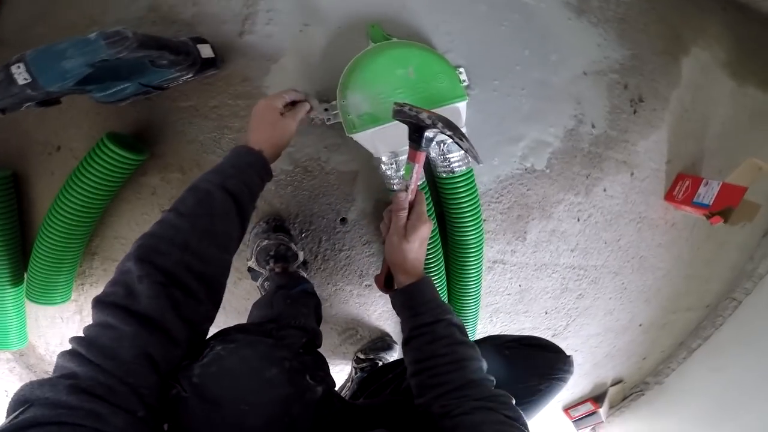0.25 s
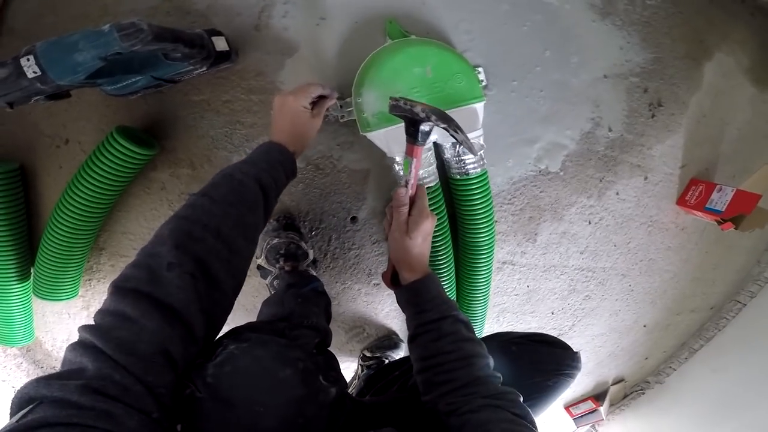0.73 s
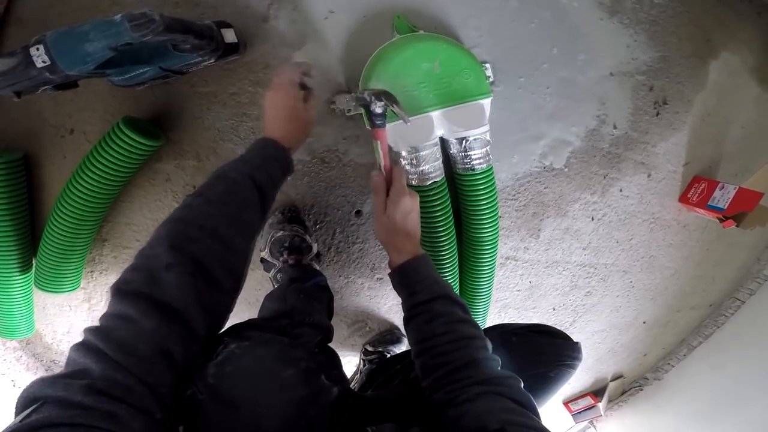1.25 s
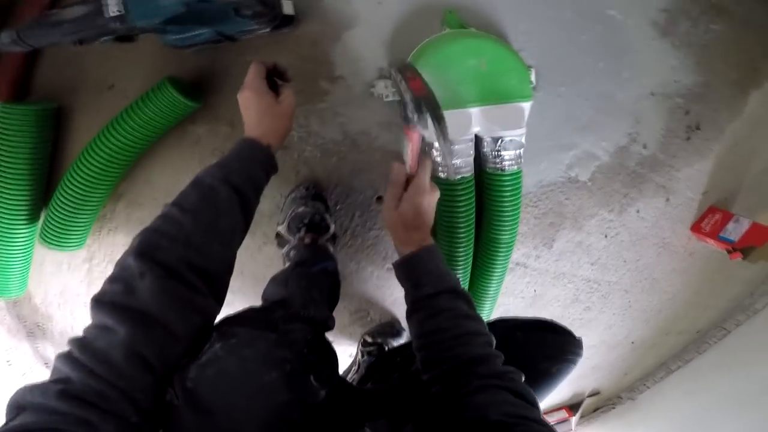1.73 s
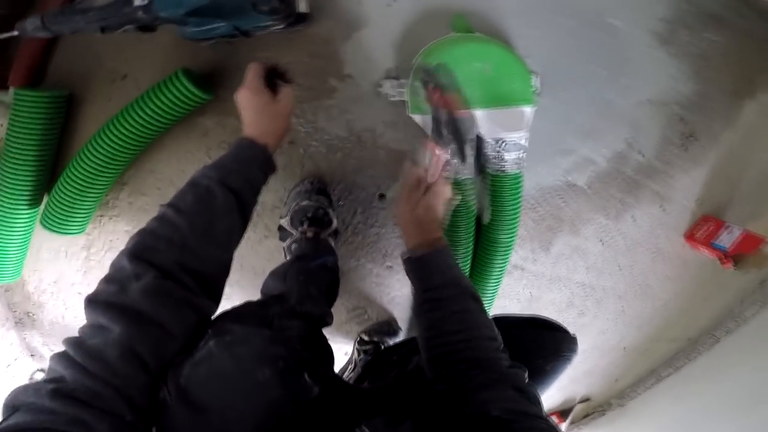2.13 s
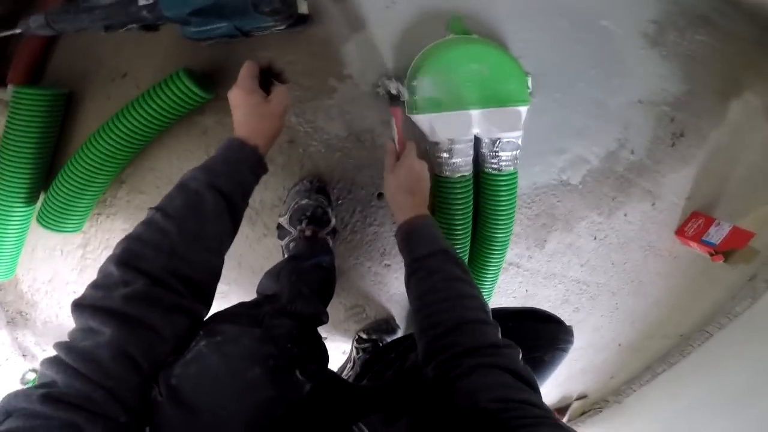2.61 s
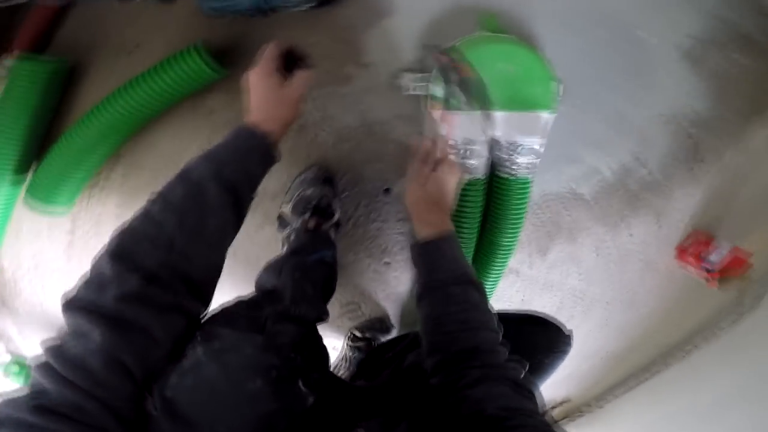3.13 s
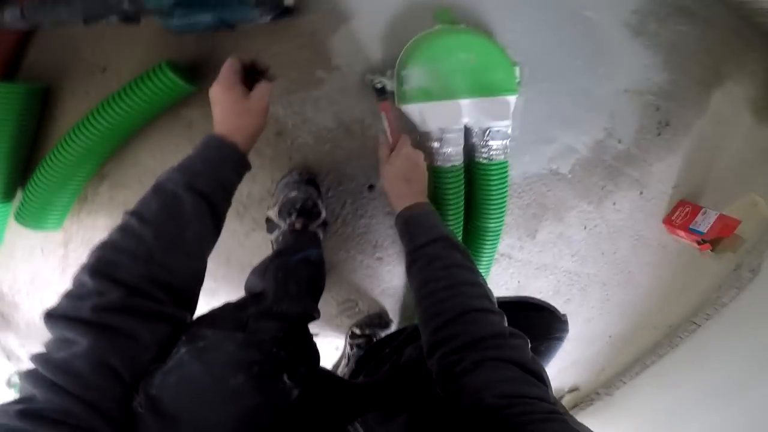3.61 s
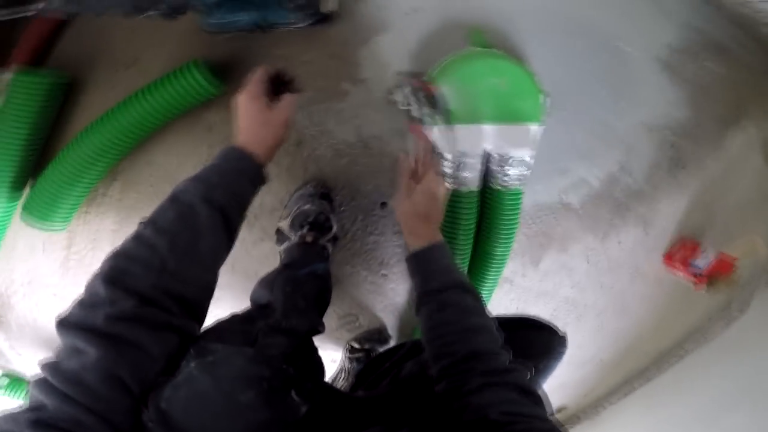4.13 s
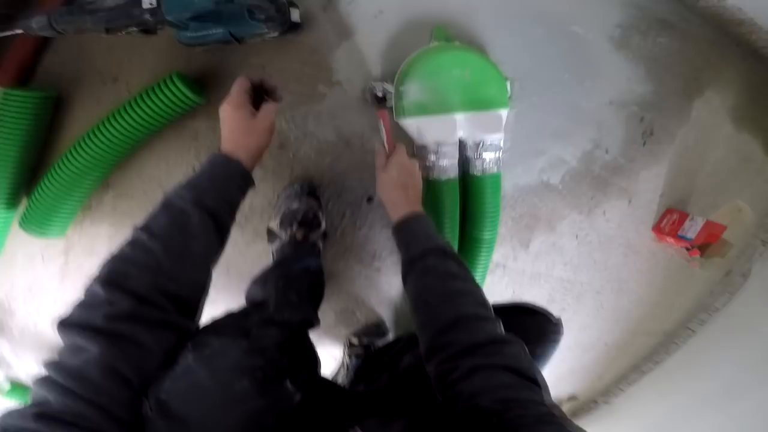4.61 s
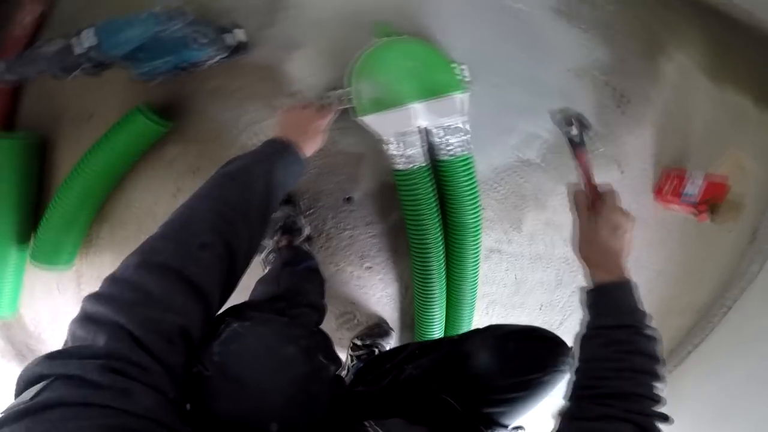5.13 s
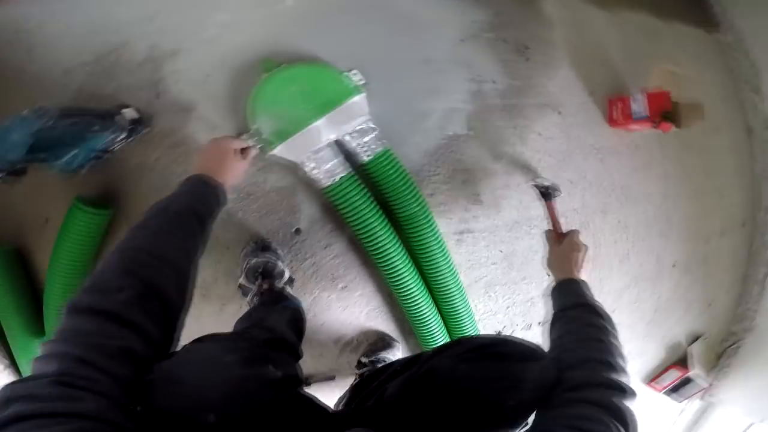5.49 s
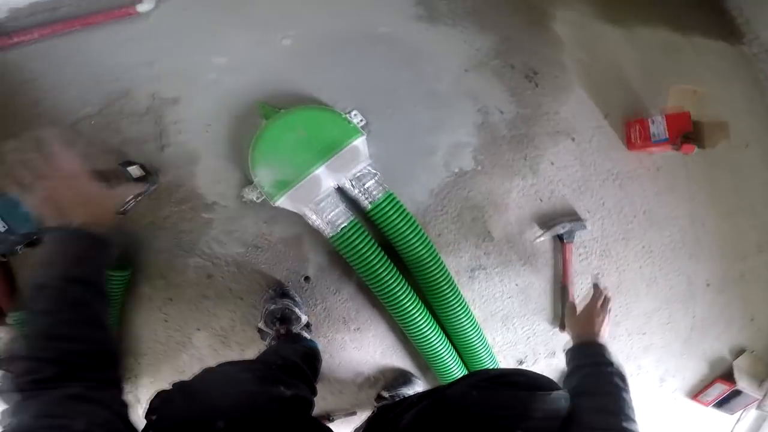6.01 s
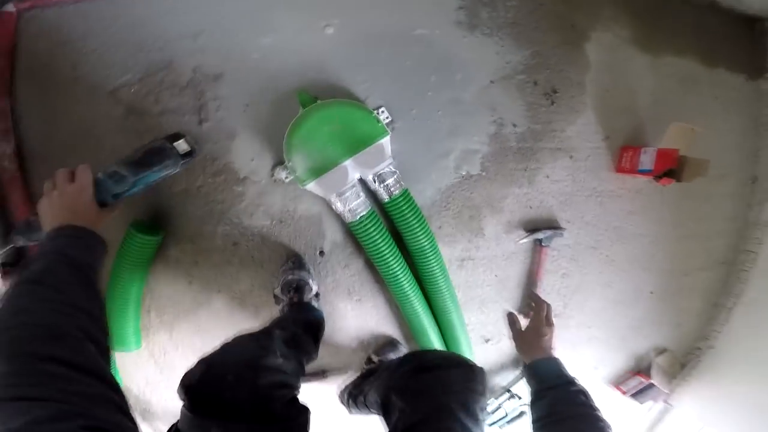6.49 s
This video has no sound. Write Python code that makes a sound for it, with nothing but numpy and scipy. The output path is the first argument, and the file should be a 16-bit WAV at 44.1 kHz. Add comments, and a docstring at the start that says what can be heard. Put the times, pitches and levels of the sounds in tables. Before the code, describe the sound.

In a bare, boomy room with a low motor hum, a steel hammer strikes a metal anchor in concrete ten times, then is laid down clinking.

```python
"""In a bare, boomy room a far motor hums throughout, as wavering tones over a rumble, and small parts tick.
From 1.5 s a steel hammer drives an anchor into a concrete floor: ten blows, each a crack, a thud of the slab,
ringing metal and the room's answer. Then a plastic box swings round on the grit (shaped noise), with hoses bumping
behind it, and the hammer is laid down with clinks (short rings). More small ticks follow, and a tool is dragged
near. Clothing rustles now and then, and a limiter squeezes the loud moments."""
import sys
import numpy as np
from scipy import signal
from scipy.io import wavfile

SR = 44100
rng = np.random.default_rng(int(sys.argv[2]) if len(sys.argv) > 2 else 0)


def materialize(psi):
    """Save the field psi as 16-bit PCM at rate SR to the path in sys.argv[1].

    A 1-D psi becomes a single channel; in a 2-D psi each row is a channel.
    """
    bounded = np.clip(np.atleast_2d(psi).T, -1, 1)
    quanta = np.round(bounded * 32767).astype(np.int16)
    wavfile.write(sys.argv[1], SR, quanta)


N = 297675   # length in samples

# Hammer blows: [start_s; crack: low_db, middle_db, bright_db, top_db; slab: deep_db, boom_db, body_db;
# room, in six ranges of pitch from 450 Hz up: six levels in dB;
# rings: face_db, high_db, claw_db, bracket_db; anchor: knock_db, knock_hz, clang_db, clang_hz]
BLOWS = [(1.526, -6, -13, -9, -2, -38, -36.5, -41, -32.5, -40, -30.5, -42, -33.5, -31, -46, -40, -43, -37, -23, 550, -28.5, 3324),
         (1.8795, -9, -9.5, -3, -2, -28.5, -31, -35.5, -34, -25.5, -29, -28, -21.5, -29, -49, -24, -42, -41, -17.5, 606, -20, 2380),
         (2.2528, 0, -12.5, -4, 4, -26.5, -29, -30.5, -59, -24.5, -31, -32.5, -25.5, -27, -39, -21.5, -30, -20.5, -29, 594, -41, 1120),
         (2.6173, 0, -9.5, -9.5, -2.5, -27.5, -28.5, -28, -31.5, -24, -28.5, -24.5, -36, -26.5, -44, -41, -54, -27.5, -26, 798, -15.5, 3290),
         (2.9521, -3.5, -12, -7.5, 0.5, -28, -29, -27, -31, -22.5, -35, -27.5, -30, -29.5, -30, -15, -48, -20, -18.5, 499, -15.5, 1080),
         (3.291, -1.5, -11, -6.5, 0, -26, -29.5, -26.5, -23, -26.5, -27.5, -32, -26, -29, -27, -28, -40, -44, -14.5, 562, -12.5, 1172),
         (3.6144, 3, -11.5, -11, -2, -29, -28.5, -27.5, -21, -28, -28.5, -27.5, -39, -30, -34, -34, -37.5, -26, -17, 490, -19, 1420),
         (3.943, -17, -3, 2.5, -2, -27, -33.5, -26.5, -24, -21.5, -28.5, -22, -21.5, -39, -38, -34, -45, -34, -5, 740, -35, 2150),
         (4.271, 2, -14, -13.5, -9.5, -31, -37.5, -31, -26, -27.5, -26.5, -33, -30.5, -42, -60, -49, -51, -28, -30, 575, -23.5, 2210),
         (4.5665, 2.5, -12, -5.5, -6, -30, -33, -31, -30.5, -22.5, -22.5, -29, -23, -36, -43, -38, -42, -15, -15.5, 599, -12, 2280)]
# Light touches of the hammer face around a blow: [start_s, level_db, clack_db, clack_hz]
REBOUNDS = [(2.9837, -24.5, -18, 1200), (3.315, -36, -28, 1260), (3.932, -42, -19, 714),
            (4.2977, -18.5, -6.5, 1950), (4.3132, -25, -6, 2070), (4.59, -21, -6.5, 1860)]


def hammer():
    """Steel meets anchor and floor: gives the blows with their room sound, and apart from them the ringing metal."""
    (start_s, low_db, middle_db, bright_db, top_db, deep_db, boom_db, body_db, *room_db,
     face_db, high_db, claw_db, bracket_db, knock_db, knock_hz, clang_db, clang_hz) = np.transpose(BLOWS)
    s = start_s + .001     # every part of the blow is timed from 1 ms after its listed start
    rebound_s, rebound_db, clack_db, clack_hz = np.transpose(REBOUNDS)

    crack_db = 3 + np.transpose([low_db, middle_db, bright_db, bright_db, top_db, top_db])
    near = sum(scattered_crack(at, db) for at, db in zip(s, crack_db))
    near = near + sum(scattered_crack(at, [db + 7] * len(CRACK)) for at, db in zip(rebound_s, rebound_db))
    thud = slab_thud(s, deep_db, boom_db, body_db, rebound_s, rebound_db)
    boom = room(s, np.array([boom_db, *room_db]))

    rings = head_rings(s, claw_db, face_db, high_db) + strike(s, bracket_db, BRACKET, spread_db=2.5)
    rings += anchor_rings(rebound_s, clack_db, clack_hz, CLACK, spread_db=1.5)
    rings += anchor_rings(s, clang_db, clang_hz, CLANG, spread_db=2.5)
    rings += anchor_knocks(s, knock_db, knock_hz)
    return near + thud + boom, rings


# Short tones that make up a crack: [pitch_hz, level_db, t60_s] (t60: time to fall by 60 dB)
CRACK = [(1100, 6.5, 0.00078), (2670, 11, 0.0016), (3750, 6.5, 0.0026), (6540, 5, 0.0023),
         (9900, -13, 0.0027), (12900, -22, 0.0048)]


def scattered_crack(at, levels_db):
    """Short tones make one crack, roughened by a fresh burst of noise and echoed by the floor."""
    t = np.arange(round(.03 * SR)) / SR
    crack = 0
    for k, (db, (hz, level_db, t60)) in enumerate(zip(levels_db, CRACK)):
        crack = crack + ring(from_db(db + level_db) * (-1) ** k * (t == 0), hz, t60)

    scatter = from_db(-11.5) * rng.standard_normal((2, len(t))) * np.exp(-t / 0.0045) * (t > .0015)
    scatter[:, 0] = 1     # the direct sound
    floor_echo_s = rng.uniform(.0028, .0034)
    scatter[:, round(floor_echo_s * SR)] += from_db(-4)

    out, first = np.zeros((2, N)), round(at * SR)
    out[:, first:first + len(t)] = signal.fftconvolve(crack[None], scatter, axes=1)[:, :len(t)]
    return out


# Slab and low room tones, sorted roughly from deep through boom to body: [pitch_hz, level_db, t60_s]
SLAB = [(30, -45, 0.27), (38, 1, 0.52), (46.35, 2, 0.56), (71.7, -0.5, 0.51), (79.08, -3, 1),
        (86.37, -9.5, 1), (102.6, 11.5, 0.35), (113.5, -11, 1), (120, -33, 0.86), (136.3, -1, 0.46),
        (146.6, 4, 0.38), (173, -6.5, 0.82), (187.7, 2, 0.52), (199.7, -5, 0.48), (223, -5, 0.94),
        (218.8, -4, 0.81), (236.5, -12.5, 1), (249, -2.5, 0.82), (266.3, -5.5, 0.67), (279.8, -9, 0.86),
        (300.5, 3, 0.22), (319.7, -4, 0.74), (341.2, 1, 0.36), (360, -9.5, 0.85), (373, -0.5, 0.39),
        (447, -5, 0.16), (431, -4.5, 0.26), (490, -45, 1)]
# First give of the floor under the blow: [pitch_hz, level_db, t60_s]
PUSH = [(165, 0, .045)]
SLAB_SHIFT = .025   # spread of the slab's pitch from blow to blow, as a share


def slab_thud(s, deep_db, boom_db, body_db, rebound_s, rebound_db):
    """The floor gives way first, then the slab and the low room tones ring, a little retuned at each blow."""
    thud = -strike(s + 0.0003, body_db + 29.5, PUSH, spread_db=4.0)
    for db, modes in zip((deep_db, boom_db, body_db), (SLAB[:9], SLAB[9:18], SLAB[18:])):
        # one part swings opposite ways left and right
        thud = thud + strike(s + 0.0047, db - 7.5, modes, spread_db=6.0) * [[1], [-1]]
        for at, blow_db, luck in zip(s, db, rng.standard_normal((len(s), len(modes)))):
            moved = [(hz * (1 + SLAB_SHIFT * z), level_db, t60) for (hz, level_db, t60), z in zip(modes, luck)]
            thud = thud + strike([at + .003], blow_db + 13, moved, spread_db=3)
    return thud + strike(rebound_s, rebound_db - 5.0, SLAB[18:], spread_db=5.0)


# Steel head: two low tones, eight of the claw, three of the face, three high ones: [pitch_hz, level_db, t60_s]
HEAD = [(1420, -3, 0.03), (2296, -13, 0.03), (2095, -9, .12), (2440, -1, 0.22), (3300, 9, .03),
        (3430, -5, .15), (3526, -1, 0.2), (3580, 6, 0.25), (2676, -9, .12), (4580, -1, .12),
        (3135, -6, .12), (3160, 5, 0.3), (4490, -2, 0.06), (8680, -6, 0.04), (8770, -6, 0.05),
        (9720, -9, 0.035)]
# Sheet-metal lug, also rung by each blow: [pitch_hz, level_db, t60_s]
BRACKET = [(900, -13, 0.028), (1035, 5, .04), (1148, 1, 0.27), (1176, -4, 0.15), (1220, 5, 0.038),
           (1372, 2, 0.074)]
WAVER_DB = 5   # spread of the rings' wavering


def head_rings(s, claw_db, face_db, high_db):
    """The struck steel head rings at its own pitches, and the rings waver randomly in level."""
    rings = 0
    for db, modes in zip((claw_db, face_db, high_db), (HEAD[4:10], HEAD[10:13], HEAD[13:])):
        rings = rings + strike(s, db, modes, spread_db=1.5) * from_db(WAVER_DB * drift(18))
    return rings


# Anchor under a rebound: [multiple of the clack pitch, level_db, t60_s]
CLACK = [(1, 0, .005), (.6, -5, .006), (1.35, -3, .004)]
# Anchor and lug jarred together: [multiple of the clang pitch, level_db, t60_s]
CLANG = [(.86, 2, .02), (.95, 5, .03), (1, 6, 0.035), (1.07, 4, 0.03), (1.16, 2.5, .03), (1.29, -1.5, .03)]


def anchor_rings(times, levels_db, pitches_hz, shape, spread_db):
    """The jarred anchor rings briefly in a cluster of tones, at a new pitch each time."""
    rings = 0
    for at, db, hz in zip(times, levels_db, pitches_hz):
        modes = [(hz * multiple, level_db, t60) for multiple, level_db, t60 in shape]
        rings = rings + strike([at], db, modes, spread_db=spread_db)
    return rings


def anchor_knocks(s, knock_db, knock_hz):
    """The struck anchor gives a short, hard snap of two tones and then rings a little."""
    knocks = 0
    for at, db, hz in zip(s, knock_db, knock_hz):
        snap = [(hz * multiple, 7, 0.03) for multiple in (1, .62)]
        knocks = knocks + strike([at], db, snap, spread_db=0)
        knocks = knocks + strike([at + .002], db, [(hz, 0, 0.12)], spread_db=0)
    return knocks


# Loudness of the reflections: [pitch_hz, level_db]
ROOM = [(60, -46), (110, -62), (180, 4.5), (330, -3.5), (500, -5), (800, -13), (1200, -11), (2100, -13),
        (3200, -13), (5000, -14.5), (6500, -4.5), (9000, -3), (10300, -5), (13000, -5), (16000, -42)]
# How long they last: [pitch_hz, t60_s]
ROOM_T60 = [(60, 1), (250, 0.49), (1000, 0.44), (4000, 0.29), (12000, 0.02)]
# Time they take to thicken: [pitch_hz, build_up_s]
BUILD_UP = [(100, 0.0022), (1000, 0.0035), (5000, 0.041)]
# Pitches that part the room's seven ranges: [pitch_hz]
SPLIT_HZ = 450, 850, 1500, 2800, 5000, 8000


def room(times, levels_db):
    """Reflections thicken, then die unevenly band by band, while a far space rings on more softly."""
    size = round(1.5 * SR)
    t = np.arange(size) / SR

    def dying(hz):
        t60 = at_hz(ROOM_T60, hz)
        build = 1 - np.exp(-(t / at_hz(BUILD_UP, hz)) ** 2)
        uneven = from_db(1.23 * drift(23)[:size])
        far_space = from_db(-20.0 - 60 * t / (3.01 * t60))
        return build * uneven * (from_db(-60 * t / t60) + far_space)

    # four different random noise patterns of the room take turns from blow to blow
    responses = [bands(white, ROOM, dying) for white in rng.standard_normal((4, 2, 2, size))]
    out = np.zeros((2, N + 2 * size))
    for k, (at, gains) in enumerate(zip(np.round(times * SR).astype(int), from_db(levels_db).T)):
        click = 1. * (np.arange(2048) == 0)
        push = gains[-1] * click
        for hz, lower, upper in zip(SPLIT_HZ, gains, gains[1:]):     # each range gets its own strength
            low_pass = signal.butter(2, hz, fs=SR, output="sos")
            push = push + (lower - upper) * signal.sosfilt(low_pass, click)
        out[:, at:at + size] += signal.fftconvolve(push[None], responses[k % 4], axes=1)[:, :size]
    return out[:, :N]


# Hammer head touching the floor as it is laid down:
# [start_s, level_db, ring_db, turn (face 0 to claw 1), click_db]
CLINKS = [(5.626, -49, -13, 1, -38), (5.6411, -41.5, 3, 0.083, -38), (5.7297, -28, 1, .01, -46),
          (5.8542, -10, -2, 0.81, -5), (5.8873, -12, -19, 0.51, -31), (5.925, -16, -15, 0.71, -25),
          (5.95, -25, -12, 0.8, -30), (6.008, -30, -9, 0.71, -32), (5.977, -15, -8, 0.28, -30),
          (6.0366, -18.5, -8.5, 0.33, -42), (6.0762, -30.5, -22, 0.74, -44)]
# Handle and grit: [pitch_hz, level_db, t60_s]
CLATTER = [(1490, -8, 0.014), (2100, 0.5, 0.0088), (2540, 3, 0.009), (3330, 6.5, 0.0063), (4660, 0, 0.0025),
           (6100, -3.5, 0.0061)]
FACE_DOWN_DB, CLAW_DOWN_DB = (10, -35, -3.5), (-28, 1, -23)   # shares of low, claw and face tones


def clinks():
    """Each touch on concrete rings the steel and clicks handle and grit, which clatter on for a tenth of a second."""
    s, db, ring_db, turn, click_db = np.transpose(CLINKS)
    shares_db = [ring_db + face + turn * (claw - face) for face, claw in zip(FACE_DOWN_DB, CLAW_DOWN_DB)]
    clatter, steel = strike(s, click_db, CLATTER, spread_db=0.0), 0
    for modes, share_db in zip((HEAD[:2], HEAD[2:10], HEAD[10:13]), shares_db):
        steel = steel + strike(s, db + share_db, modes, spread_db=1.5)

    late = 0.1 * rng.random((len(s), 40)).T     # forty weaker touches after each one, in seconds
    late_s = (s + late).ravel()
    clatter += strike(late_s, (db - 20 - 60 * late).ravel(), CLATTER[:5], spread_db=3)
    steel += strike(late_s, (db + shares_db[1] - 35 - 30 * late).ravel(), HEAD[2:10], spread_db=2.5)
    return clatter, steel


# Fingers and small parts ticking: [start_s, level_db, pitch_hz]
TICKS = [(0.58, -40, 3480), (0.8205, -42, 3030), (0.9738, -35.5, 2840), (0.989, -28.5, 2540),
         (1.011, -27, 3120), (1.041, -32, 2820), (1.052, -29.5, 2370), (1.115, -40.5, 3000),
         (6.289, -28.5, 3350), (6.2938, -27.5, 2440), (6.4486, -32.5, 2480), (6.486, -37, 3330)]


def ticks():
    """Small parts tick in flurries: a very short ring of four tones, then four weaker ones close behind."""
    out = np.zeros(N)
    for (at, db, hz), late in zip(TICKS, 0.0071 * rng.random((len(TICKS), 4))):
        modes = [(hz, 0, .005), (hz * 2.4, -14, .004), (hz * 0.71, -12, .005), (hz * 1.225, -5, .005)]
        levels_db = db + 2 - 14 * np.sign(np.r_[0, late])     # the later ones are 14 dB weaker
        out += strike([at, *(at + late)], levels_db, modes, spread_db=2)
    return out


# Things dragged over grit: [start_s, loudest_s, level_db, bright_share_db]
SCRAPES = [(5.305, 5.402, -29.5, -5), (6.579, 6.661, -38, 9)]
# Dull part of the scrape: [pitch_hz, level_db]
GRIT = [(180, -40), (300, -7), (813, -21), (1010, -8.5), (1640, -3.5), (2670, -11.5), (4500, -39),
        (5850, -39), (9900, -120)]
# Bright part of the scrape: [pitch_hz, level_db]
SHEEN = [(2060, -0.5), (3500, -5), (7960, -2), (9730, -39), (10700, -17), (13000, -33), (15000, -34)]
BITE_S, BITE_DB = 0.019, -9   # the grit bites quickly to a level below the loudest
RASP_FALL_DB_PER_S, SHEEN_FALL_DB_PER_S = 265, 100


def scrapes():
    """Grit under a dragged thing: a dull grainy rasp and a brighter sheen that fades more slowly."""
    t, rasp, sheen = np.arange(N) / SR, 0, 0
    for start, top, db, bright_db in SCRAPES:
        rise_db = np.interp(t, [start - BITE_S, start, start + BITE_S, top], [-80, -25, BITE_DB, 0])
        after = np.maximum(t - top, 0)
        rasp = rasp + from_db(db + rise_db - RASP_FALL_DB_PER_S * after)
        sheen = sheen + from_db(db + bright_db + rise_db - SHEEN_FALL_DB_PER_S * after)
    return rasp * hiss(GRIT, 1.0, 3.7) + sheen * hiss(SHEEN, 0.34, 2.5)


# Ribbed hoses bumping along behind the box: [time_s, level_db]
HOSES = [(5.36, -65), (5.408, -29.5), (5.47, -47), (5.654, -33), (5.796, -34.5), (5.958, -28),
         (6.23, -39.5), (6.29, -64), (6.4, -43), (6.54, -49)]
# Their colour: [pitch_hz, level_db]
HOSE = [(18, -19), (30, 4.5), (98, -20), (119, -9.5), (156, 6), (347, -13), (900, -15), (1170, -21),
        (1980, -120)]


def hoses():
    """Low noise swells and sinks as the ribbed hoses bump along."""
    return from_db(in_time(HOSES)) * hiss(HOSE, 0.84, 0)


def reflections(x):
    """The room answers light, bright contacts with dense noise that falls by 60 dB in half a second."""
    t = np.arange(round(.8 * SR)) / SR
    mid, side = rng.standard_normal((2, len(t)))
    stereo = mid + from_db(-3.5) * side * [[1], [-1]]
    response = stereo * from_db(-60 * t / 0.5) * (1 - np.exp(-t / 0.0005))
    response = response / np.sqrt(np.sum(response ** 2) / 2)
    return signal.fftconvolve(x, response, axes=1)[:, :N]


# Clothing swells: [loudest_s, level_db, rise_s, fall_s]
RUSTLE = [(.404, -62, 1.1, 0.42), (3.265, -43, 0.073, 0.18), (4.86, -51.5, 0.14, 0.54),
          (5.64, -40.5, 0.36, 0.38), (6.394, -48, 1.3, 1)]
# Colour of the cloth: [pitch_hz, level_db]
CLOTH = [(710, -32), (1200, -10), (1830, 8), (2520, -12), (2730, -12), (6750, -2), (14000, -37)]


def clothing():
    """Rubbing cloth is grainy noise that swells and fades."""
    return swells(RUSTLE) * hiss(CLOTH, 0.46, 3.0)


# Motor tone: [time_s, level_db]
HUM = [(0, -34.5), (.3, -33), (.49, -40.5), (.55, -34.5), (1.5, -38.5), (5.4, -39), (6.3, -39.5),
       (6.75, -45)]
# Tones above the motor's base pitch: [multiple, level_db]
HUM_ORDERS = [(2, 5), (4, -16), (5, -20.5), (6, -23), (8, -20), (9, -44)]
# The motor's fourth multiple swells once: [loudest_s, level_db, rise_s, fall_s]
GROAN = [(.52, -40.5, 0.35, 0.36)]
# Colour of the rumble: [pitch_hz, level_db]
RUMBLE = [(12, -43), (20, 10), (43, -5), (74, 1.5), (103, -5.5), (121, -16), (147, -10.5), (270, -12),
          (674, -24.5), (4560, -45.5), (7300, -38.5), (12000, -53), (15000, -95.5)]
HUM_HZ, RUMBLE_DB = 46.5, -38.5   # mean base pitch, rumble level


def motor():
    """Multiples of a slow motor's slightly wandering pitch waver over a broad rumble."""
    turn = 2 * np.pi * np.cumsum(HUM_HZ * (1 + 0.0043 * drift(2.4))) / SR
    tones = 0
    for k, db in HUM_ORDERS:
        waver_db = (2.0 if k == 2 else 5.0) * drift(1.0)
        tones = tones + from_db(db + waver_db) * np.sin(k * turn + 2 * np.pi * rng.random())
    groan = swells(GROAN) * np.sin(4 * turn)
    return from_db(in_time(HUM)) * tones + groan + from_db(RUMBLE_DB) * hiss(RUMBLE, 0.74, 0)


def swells(rows):
    """Each swell rises to its top and falls away, straight in dB: 31 dB per rise or fall time."""
    t = np.arange(N) / SR
    return sum(from_db(db - 31 * np.maximum((at - t) / rise, (t - at) / fall)) for at, db, rise, fall in rows)


def strike(times, db, modes, spread_db):
    """Each blow strikes every mode (one ringing tone) with a strength of its own."""
    at, out = np.round(np.array(times) * SR).astype(int), np.zeros(N)
    first, last = at.min(), min(N, at.max() + SR)     # stop one second after the last blow
    luck = rng.standard_normal((len(at), len(modes)))
    for k, (hz, level_db, t60) in enumerate(modes):
        clicks = np.zeros(last - first)
        clicks[at - first] = from_db(db + level_db + spread_db * luck[:, k]) * (-1) ** k
        out[first:last] += ring(clicks, hz, t60)
    return out


def ring(clicks, hz, t60):
    """A unit click sets a dying sine of starting height 1 ringing."""
    r, w = from_db(-60 / (t60 * SR)), 2 * np.pi * hz / SR
    return signal.lfilter([0, np.sin(w)], [1, -2 * r * np.cos(w), r * r], clicks + 1e-18)


def hiss(spectrum, patchy_db, grain_db):
    """Coloured noise, patchy from band to band and made of uneven grains."""
    white = rng.standard_normal((2, 2, N)) * from_db(grain_db * drift(86))
    together = drift(34)
    return bands(white, spectrum, lambda hz: from_db(patchy_db * (together + drift(36))))


# How alike noise is left and right: [pitch_hz, likeness (0 to 1)]
LIKENESS = [(25, 0.52), (60, 0.14), (150, 1), (350, 0.78), (700, 0.15), (1500, 0.0091), (3000, 0.62),
            (6000, 0.15), (10000, 0)]


def bands(white, spectrum, shape):
    """Half-octave bands of stereo noise, each with its level, likeness and a gain in time shape(hz); rms 1."""
    out, edges = 0, 20 * 2 ** np.arange(0, 10, .5)
    for k, (low, high) in enumerate(zip(edges, edges[1:])):
        hz = np.sqrt(low * high)
        if at_hz(spectrum, hz) > -75:     # skip very weak bands
            band_pass = signal.butter(2, [low, high], "band", fs=SR, output="sos")
            mid, side = signal.sosfilt(band_pass, white[k % 2])
            alike = np.clip(at_hz(LIKENESS, hz), 0, 1)
            stereo = np.sqrt(1 + alike) * mid + np.sqrt(1 - alike) * side * [[1], [-1]]
            out = out + from_db(at_hz(spectrum, hz)) * shape(hz) * stereo
    return rms_one(out)


def drift(rate):
    """Smooth random wandering of rms 1; a higher rate (Hz) wanders faster."""
    r = np.exp(-80 * np.pi * rate / SR)     # worked out at every 40th sample
    slow = signal.lfilter([1], [1, -2 * r, r * r], rng.standard_normal(N // 40 + 2002))[2000:]
    return np.interp(np.arange(N) / 40, np.arange(len(slow)), rms_one(slow))


def in_time(rows):
    """A level curve in dB on the time axis; -100 dB before and after."""
    s, db = np.transpose(rows)
    return np.interp(np.arange(N) / SR, s, db, left=-100, right=-100)


def at_hz(points, hz):
    """Reads a table at any pitch, between its points along a log scale of pitch."""
    return np.interp(np.log(hz), np.log(np.array(points)[:, 0]), np.array(points)[:, 1])


def from_db(db):
    """Turns decibels into a plain multiplier."""
    return 10 ** (np.asarray(db) / 20)


def rms_one(x):
    """Scales a sound to an rms (average strength) of 1."""
    return x / np.sqrt(np.mean(x ** 2) + 1e-20)


def scene():
    """Adds all sources, with slight left-right leanings and the room's answer to the light contacts."""
    blows, rings = hammer()
    clatter, steel = clinks()
    lean_right = from_db([[-1.0], [1.0]])
    dull, steel = (clatter + ticks()) * lean_right, steel * lean_right
    light = dull + scrapes()
    wet = reflections(from_db(-2.5) * light + from_db(-5) * (rings + steel))
    contacts = blows * from_db([[.3], [-.3]]) + rings + steel + light
    return contacts + wet + clothing() + hoses() + motor()


def record(dry):
    """A limiter looks a moment ahead, squeezes what passes its ceiling and lets go steadily; the top is cut."""
    ceiling_db, release_db_per_s, attack_s = -10, 150, .001
    level_db = 20 * np.log10(np.abs(dry).max(axis=0) + 1e-9)
    slope = release_db_per_s * np.arange(N) / SR
    held_db = np.maximum.accumulate(level_db + slope) - slope     # peaks that sink steadily
    over_db = np.maximum(held_db - ceiling_db, 0)
    r = np.exp(-1 / (attack_s * SR))
    smooth_db = signal.lfilter([1 - r], [1, -r], over_db)
    squeezed = dry * from_db(-.7 * np.roll(smooth_db, -40))     # takes off 0.7 of the excess, 40 samples early
    rounded = .8 * np.tanh(squeezed / .8)     # peaks are rounded softly
    return signal.sosfilt(signal.cheby2(12, 70, 16400, fs=SR, output="sos"), rounded)


dry = scene()
out = record(dry)
materialize(out)
```